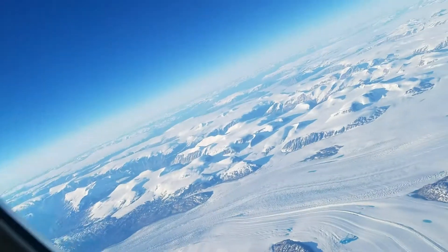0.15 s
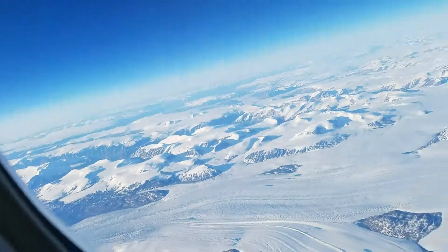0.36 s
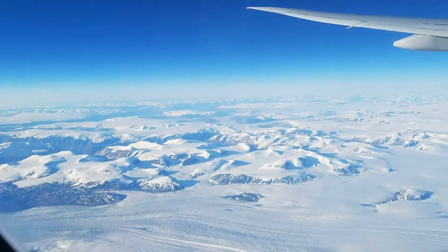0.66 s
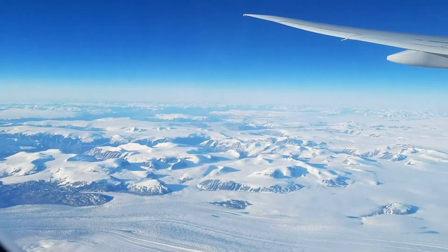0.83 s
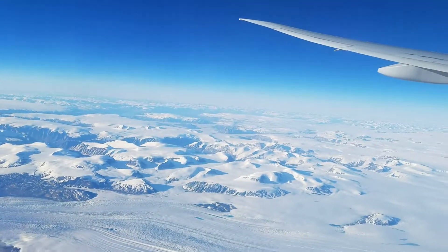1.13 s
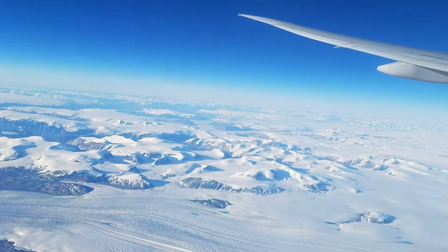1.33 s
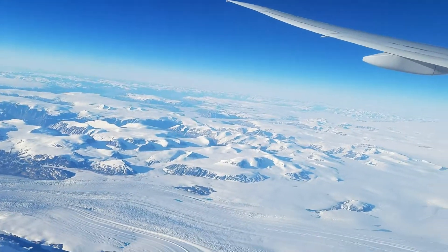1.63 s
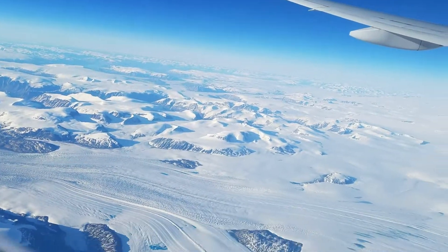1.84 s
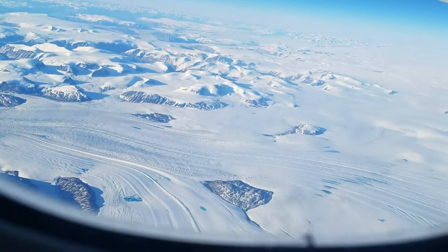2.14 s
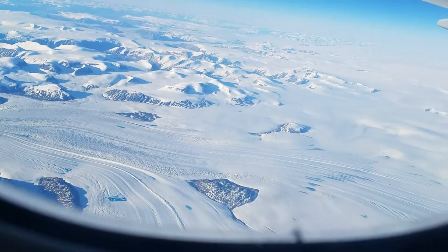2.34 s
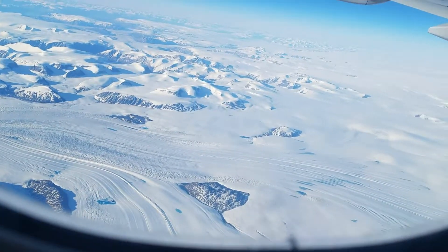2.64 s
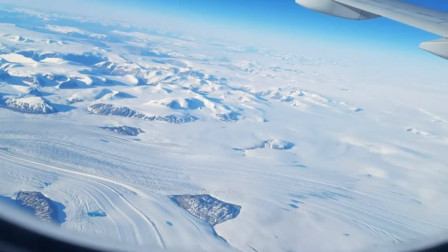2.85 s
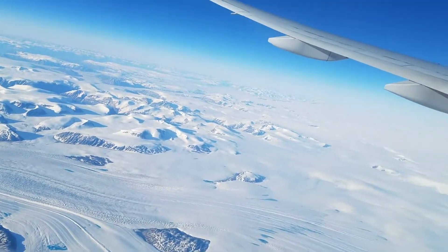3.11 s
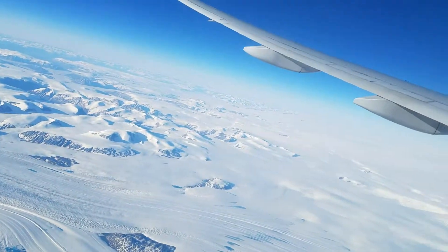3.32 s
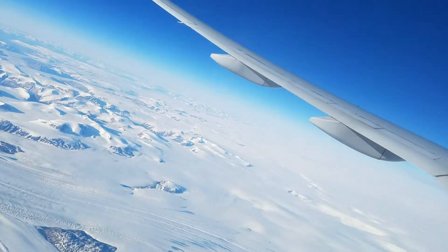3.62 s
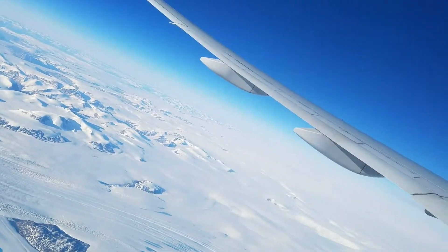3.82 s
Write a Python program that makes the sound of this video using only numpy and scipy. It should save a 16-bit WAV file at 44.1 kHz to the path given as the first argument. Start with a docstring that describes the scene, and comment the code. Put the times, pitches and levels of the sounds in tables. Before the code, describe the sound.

Steady, loud low roar of jet engines and airstream inside an airliner cabin, booming near a window; a thin air hiss on the left weakens after two seconds. Close handheld stereo microphone, right side duller.

```python
"""Engine and airstream roar booms through the wall of an airliner cabin at cruise, close to a window.
Roar and air hiss are shaped noise. The left port of a hand-held recorder gets the hiss, in four bands
that fade as the recorder turns. The muffled right port hears the boom dull and late through a low-pass,
with some roar of its own. Self-noise lies beneath, and a compressor holds the peaks."""
import sys
import numpy as np
from scipy import signal
from scipy.fft import rfft, irfft, next_fast_len
from scipy.io import wavfile
from scipy.ndimage import uniform_filter1d, minimum_filter1d

SR = 44100
rng = np.random.default_rng(int(sys.argv[2]) if len(sys.argv) > 2 else 0)


def bounce(signal):
    """Save signal as a 16-bit WAV file at the path given by the first command-line argument."""
    frames = np.transpose(np.atleast_2d(signal))
    limited = np.clip(frames, -1, 1)
    pcm = np.round(limited * 32767).astype(np.int16)
    wavfile.write(sys.argv[1], SR, pcm)


N = 175077  # length in samples
PATCH_SPREAD_DB, PATCH_RATE_HZ = 0.71, 21  # wander of the hiss and of the upper roar


def from_db(db):
    """Decibels to amplitude gain."""
    return 10 ** (np.asarray(db) / 20)


def rms_one(x):
    """Scale to rms 1."""
    return x / np.sqrt(np.mean(x ** 2) + 1e-20)


def in_time(rows):
    """Columns of a curve table, joined by straight lines to one value a sample."""
    seconds, *columns = np.transpose(rows)
    return [np.interp(np.arange(N) / SR, seconds, column) for column in columns]


def drift(rate_hz):
    """Random wander of spread 1: noise through two equal one-pole low-passes at the rate."""
    step = 40  # samples between drawn points
    pole = np.exp(-2 * np.pi * rate_hz * step / SR)
    draws = rng.standard_normal(N // step + 2002)
    wander = signal.lfilter([1], [1, -2 * pole, pole * pole], draws)[2000:]  # drop the run-in
    wander = rms_one(wander - wander.mean())
    return np.interp(np.arange(N) / step, np.arange(len(wander)), wander)


def noise(spectrum):
    """Gaussian noise of rms 1, shaped by a spectrum that falls away past its ends."""
    size = next_fast_len(N)
    hz = np.maximum(np.arange(size // 2 + 1) * SR / size, 1)
    points_hz, points_db = np.transpose(spectrum)
    gain = from_db(np.interp(np.log(hz), np.log(points_hz), points_db))
    gain *= np.minimum(hz / points_hz[0], 1) ** 2  # below the first point
    gain *= np.minimum(points_hz[-1] / hz, 1) ** 4  # above the last point
    shaped = irfft(rfft(rng.standard_normal(size)) * gain, size)
    return rms_one(shaped[:N])


def split(x, hz):
    """Parts below and above a frequency, which add up to the whole."""
    low = signal.sosfiltfilt(signal.butter(3, hz, fs=SR, output="sos"), x)
    return low, x - low


def patches():
    """Random wander of level, as a gain."""
    return from_db(PATCH_SPREAD_DB * drift(PATCH_RATE_HZ))


def self_noise():
    """Hiss of the two microphones themselves, independent in each."""
    # Spectrum of one microphone. Each row: frequency in Hz, relative level in dB per Hz.
    self_spectrum = [(3000, -14), (8500, -13), (11000, -9), (15800, 0)]
    level_db = -72.5
    return from_db(level_db) * np.array([noise(self_spectrum), noise(self_spectrum)])


def hiss():
    """Air hiss at the left port: shaped noise in four bands, each following its own level."""
    # Spectrum of the hiss. Each row: frequency in Hz, relative level in dB per Hz.
    hiss_spectrum = [(1500, -2.5), (1850, 1.5), (3100, -10), (5000, -16.5), (6600, -20), (8600, -36.5),
                     (11000, -24.5), (13000, -18.5), (15000, -14), (15800, -13)]
    # Band levels ahead of the common gain. Each row: time in seconds, then the low, middle,
    # high and top band in dB.
    hiss_levels = [(0.0, -57, -61, -67, -57), (0.1, -46, -71, -72, -72), (0.13, -49, -60.5, -69.5, -66.5),
                   (0.28, -47, -58.5, -58.5, -56.5), (0.44, -47.5, -59, -65.5, -61.5),
                   (1.19, -51, -62, -65.5, -66), (1.23, -52, -62, -71, -70), (1.45, -52.5, -64, -67, -60),
                   (1.84, -51, -63, -70.5, -69), (1.91, -51, -58, -72.5, -67.5),
                   (1.99, -50, -74, -80, -66.5), (2.13, -48.5, -71, -74, -70), (2.14, -45, -80, -78.5, -65),
                   (2.26, -62, -84, -79.5, -71), (2.35, -51.5, -83, -78, -72.5),
                   (2.49, -51.5, -79.5, -73.5, -73.5), (2.66, -65.5, -87, -84, -74),
                   (2.91, -72.5, -87.5, -83.5, -75.5), (3.21, -56.5, -86, -80.5, -70.5),
                   (3.55, -63.5, -87, -86.5, -78), (3.59, -73, -83, -80, -74), (3.92, -67, -91, -83, -79.5)]
    low_edge_hz, middle_edge_hz, top_edge_hz = 4200, 8600, 13500
    gain_db = 6.5
    below, above = split(noise(hiss_spectrum), middle_edge_hz)
    bands = [*split(below, low_edge_hz), *split(above, top_edge_hz)]
    levels_db = in_time(hiss_levels)
    mixed = sum(rms_one(band) * from_db(db) for band, db in zip(bands, levels_db))
    return from_db(gain_db) * patches() * mixed


def muffled(left):
    """The left port's low roar as the muffled port hears it: a one-pole low-pass dulls and delays it."""
    shared_top_hz, corner_hz, gain_db = 560, 240, -2.5
    pole = np.exp(-2 * np.pi * corner_hz / SR)
    shared, _ = split(left, shared_top_hz)
    return from_db(gain_db) * signal.lfilter([1 - pole], [1, -pole], shared)


def roar():
    """Roar through the cabin wall: a boom shared by both ports, and upper roar that differs."""
    # Spectrum at the left port. Each row: frequency in Hz, relative level in dB per Hz.
    left_spectrum = [(25, -39.5), (48, -33), (80, -15), (105, -5), (122, -4.5), (135, -0.5), (175, 0),
                     (195, -9), (250, -6.5), (295, -17.5), (355, -14), (430, -19), (495, -27), (585, -23),
                     (650, -28), (995, -33.5), (1340, -40.5), (1420, -43.5), (2200, -55.5), (3500, -70.5),
                     (6000, -87), (9000, -110)]
    # Rise and fall of the roar; only departures from each mean count.
    # Each row: time in seconds, boom in dB, upper roar in dB.
    roar_levels = [(0.0, -17.5, -42), (0.02, -15, -38), (0.81, -11, -36), (1.79, -15.5, -37),
                   (2.53, -9, -32.5), (2.75, -12.5, -40), (2.79, -10, -38.5), (3.7, -10.5, -34),
                   (3.88, -10.5, -39), (3.92, -9, -44)]
    # Roar that only the right port hears. Each row: frequency in Hz, relative level in dB per Hz.
    right_spectrum = [(30, -35), (60, -16), (150, -2.5), (215, -0.5), (300, -16.5), (480, -20), (650, -27),
                      (730, -20.5), (1000, -31.5), (1500, -43), (2800, -57), (4300, -63), (6000, -72.5),
                      (8000, -80.5)]
    # Extra loss at the right port as the grip shifts. Each row: time in seconds, loss in dB.
    grip_loss = [(0, 4), (.5, 1.5), (1, 0), (1.7, -.3), (2.2, 1.5), (2.9, 1.1), (3.9, -.5)]
    left_db, right_own_db = -8.5, -24.5
    split_hz = 480  # between boom and upper roar
    boom_follows = 0.6  # share of the boom's level changes that is applied
    boom_db, upper_db = in_time(roar_levels)
    boom, upper = split(from_db(left_db) * noise(left_spectrum), split_hz)
    swell = from_db(boom_follows * (boom_db - boom_db.mean()))
    upper_swell = from_db(upper_db - upper_db.mean())
    left = boom * swell + upper * upper_swell * patches()
    right = muffled(left) + from_db(right_own_db) * swell * noise(right_spectrum)
    loss_db, = in_time(grip_loss)
    return np.array([left, right * from_db(-loss_db)])


def scene():
    """Roar at both ports, hiss at the left alone."""
    return roar() + hiss() * [[1], [0]]


def compress(x):
    """Fast compressor: the louder channel sets one gain for both, turned down ahead of each peak."""
    threshold_db, squeeze = -2, 0.78  # squeeze: dB taken off per dB over the threshold
    release_db_per_s, attack_s = 125.5, 0.002
    peak_db = 20 * np.log10(np.abs(x).max(axis=0) + 1e-9)
    wanted_db = squeeze * np.maximum(peak_db - threshold_db, 0)
    # After a peak the reduction falls back at a steady rate in dB.
    ramp = release_db_per_s * np.arange(N) / SR
    released_db = np.maximum.accumulate(wanted_db + ramp) - ramp
    # Hold the largest reduction on either side, then round its steps.
    hold = int(attack_s * SR) * 2 + 1
    reduction_db = -minimum_filter1d(-released_db, size=hold)
    for _ in range(2):
        reduction_db = uniform_filter1d(reduction_db, size=hold // 2 + 1)
    return x * from_db(-reduction_db)


def cut_top(x):
    """Remove everything above the recorder's cutoff, with a 40 Hz slope beneath it."""
    cutoff_hz = 15790
    size = next_fast_len(N + SR // 10)
    hz = np.arange(size // 2 + 1) * SR / size
    keep = np.clip((cutoff_hz - hz) / 40, 0, 1)
    return irfft(rfft(x, size) * keep, size)[:, :N]


def record(dry):
    """The recorder: self-noise, compressor, a rounded ceiling on the waveform and the top cut."""
    ceiling = 0.96  # of full scale, ahead of the top cut
    evened = compress(dry + self_noise())
    rounded = evened / (1 + (evened / ceiling) ** 8) ** (1 / 8)
    return cut_top(rounded)


dry = scene()
out = record(dry)
bounce(out)
```